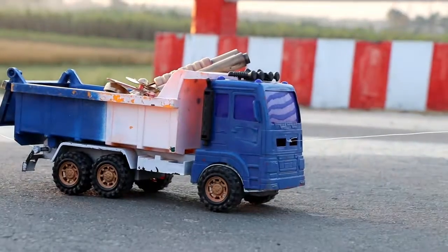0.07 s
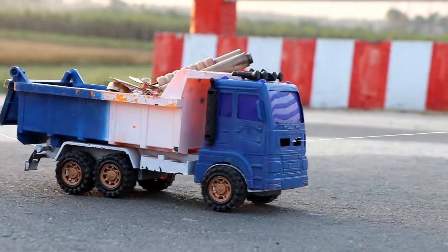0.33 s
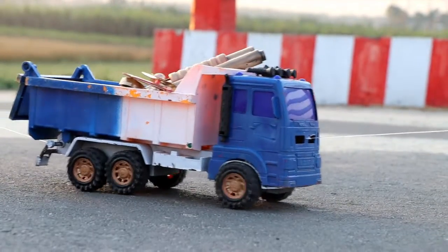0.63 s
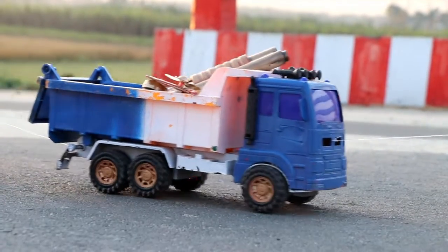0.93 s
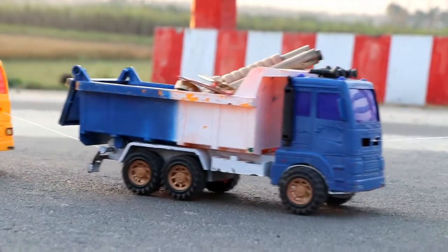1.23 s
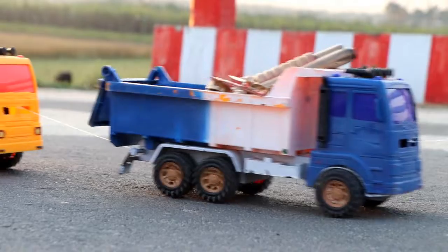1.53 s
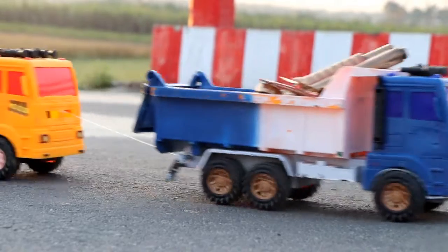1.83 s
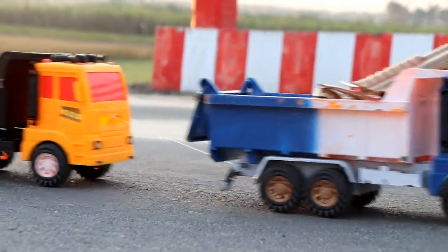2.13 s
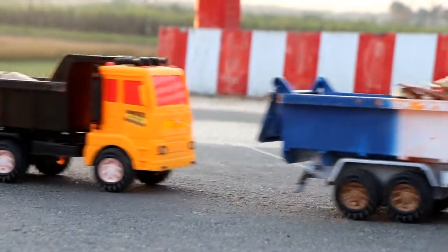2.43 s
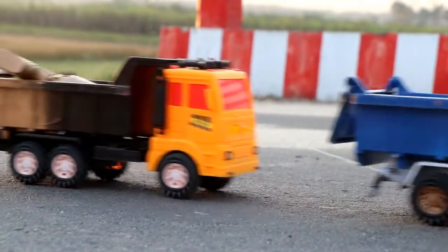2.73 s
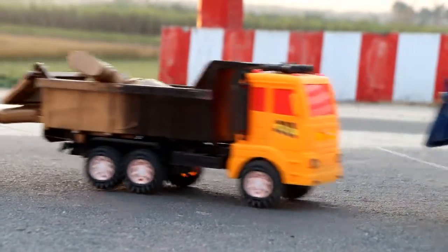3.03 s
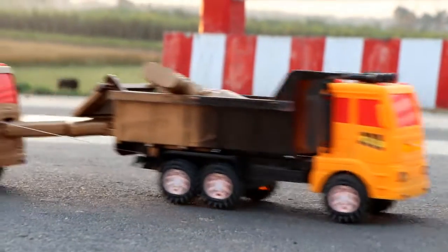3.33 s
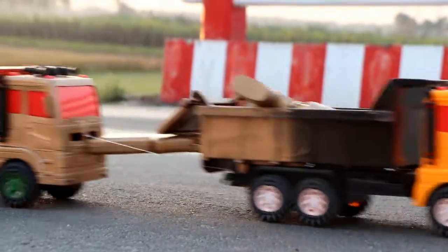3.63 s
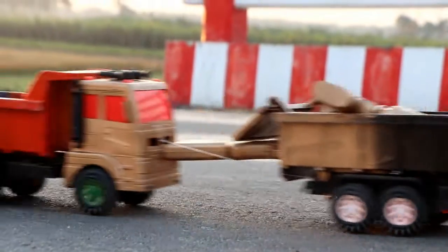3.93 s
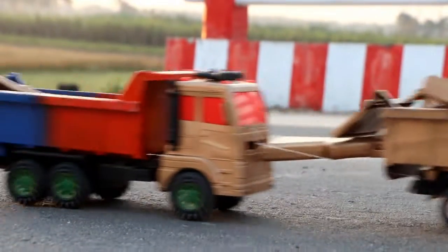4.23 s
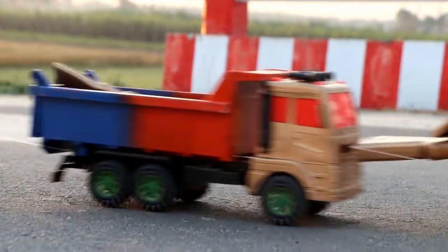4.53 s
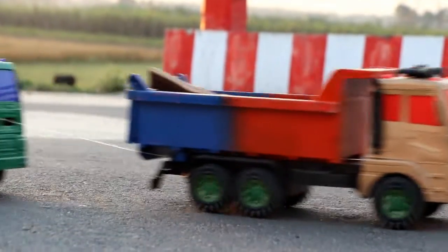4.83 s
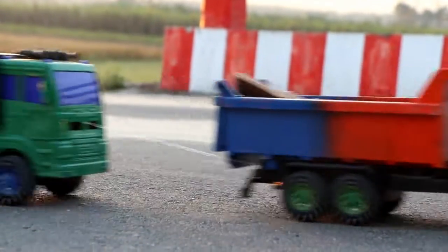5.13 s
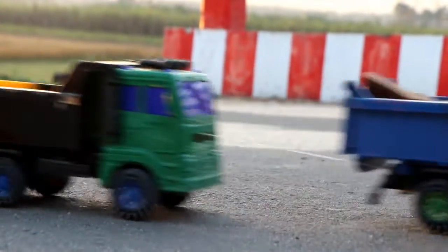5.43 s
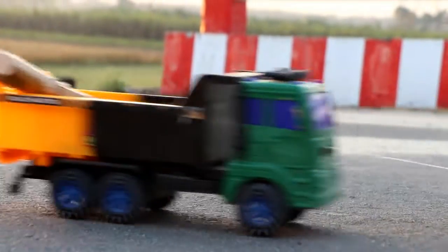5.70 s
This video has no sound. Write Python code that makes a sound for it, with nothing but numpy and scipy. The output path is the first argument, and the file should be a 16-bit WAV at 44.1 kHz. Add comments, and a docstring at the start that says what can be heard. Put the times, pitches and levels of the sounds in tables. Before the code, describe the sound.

Hollow plastic toy trucks roll close past over asphalt, rattling and knocking louder as they speed up, with grit crackling under their wheels.

```python
"""A string of hollow plastic toy trucks is pulled over asphalt, close past the listener.
First a far single-cylinder engine thuds in open country, with a brief hollow din and faint tones.
From 0.6 s the trucks crawl: dry axles chirp, wheels drop off stones and knock the plastic panels.
From about 2 s they roll faster and nearer; treads shake the shells, loose parts clatter, grit cracks.
The rear trucks take over by 3.8 s and rattle on to the end while the engine fades away."""
import sys
import numpy as np
from scipy import signal
from scipy.fft import rfft, irfft, next_fast_len
from scipy.io import wavfile
from scipy.ndimage import uniform_filter1d

SR = 44100
rng = np.random.default_rng(int(sys.argv[2]) if len(sys.argv) > 2 else 0)


def generate_wav(sig):
    """Save sig (samples, or channels by samples) to the path in sys.argv[1] as 16-bit PCM at SR."""
    pcm = np.round(np.clip(np.atleast_2d(sig).T, -1, 1) * 32767).astype(np.int16)
    wavfile.write(sys.argv[1], SR, pcm)


N = 258602
TIME = np.arange(N) / SR


def amp(db):
    """dB to gain."""
    return 10 ** (np.asarray(db) / 20)


def unit(x):
    """Scale to rms 1."""
    return x / np.sqrt(np.mean(x ** 2) + 1e-20)


def along(points, hz):
    """Interpolate (f, value) points on a log axis."""
    f, v = np.transpose(points)
    return np.interp(np.log(hz + 1), np.log(f + 1), v)


def curves(rows):
    """One per-sample curve for each column after t."""
    times, *columns = np.transpose(rows)
    return [np.interp(TIME, times, column) for column in columns]


def gate(rows, fade_samples):
    """Soft on/off from the first to the last row's t."""
    return uniform_filter1d(1. * ((TIME > rows[0][0]) & (TIME < rows[-1][0])), fade_samples)


def wobble(rate_hz):
    """Smooth random curve with knots at rate_hz."""
    knots = rng.standard_normal(int(N * rate_hz / SR) + 4)
    fine = signal.resample_poly(knots, 8, 1)
    return np.interp(TIME * rate_hz, np.linspace(0, len(knots), len(fine), endpoint=False), fine)


def filtered(x, response):
    """Apply a complex frequency response."""
    n = x.shape[-1]
    m = 2 * next_fast_len(n // 2 + 2048)
    return irfft(rfft(x, m) * response(np.fft.rfftfreq(m, 1 / SR)), m)[..., :n]


def colour(spectrum):
    """Minimum-phase response for (f, level) points."""
    def response(hz):
        cepstrum = irfft(np.log(amp(along(spectrum, hz))))
        cepstrum[1:len(cepstrum) // 2] *= 2
        cepstrum[len(cepstrum) // 2 + 1:] = 0
        return np.exp(rfft(cepstrum))
    return response


def shaped(x, spectrum):
    """Filter by a spectrum, scale to rms 1."""
    return unit(filtered(x, colour(spectrum)))


def resonance(f_hz, q):
    """Response of one ringing mode."""
    return lambda hz: 1j * hz * f_hz / (q * (f_hz ** 2 - hz ** 2) + 1j * hz * f_hz)


def shimmer(x, depth_db):
    """Small shifting spectral peaks; on a truck, different wheels and panels taking the blows."""
    bins = signal.stft(x, nperseg=1024)[2]
    field = uniform_filter1d(rng.standard_normal(bins.shape[1:]), size=4, axis=0)
    field = uniform_filter1d(field, size=7, axis=1)
    return signal.istft(bins * amp(depth_db * unit(field)), nperseg=1024)[1][:, :N]


def pan(db):
    """Stereo gains for an L-R level difference."""
    gains = amp(np.array([db, -db]).reshape(2, -1) / 2)
    return gains / np.sqrt(np.mean(gains ** 2, axis=0))


# L-R coherence: f/Hz, correlation
COHERENCE = [(100, 0.81), (300, 0.98), (700, 0.89), (1400, 0.95), (3000, 0.028), (8000, 0.046)]


def noise(size=N, lag_s=0.00012):
    """Noise at two microphone ports: alike in the bass, left delayed by lag_s."""
    m = 2 * next_fast_len(size // 2 + 1)
    hz = np.fft.rfftfreq(m, 1 / SR)
    angle = np.arccos(np.clip(along(COHERENCE, hz), -1, 1)) / 2
    mid, side = rfft(rng.standard_normal((2, m))) * np.array([np.cos(angle), np.sin(angle)])
    left = (mid + side) * np.exp(-2j * np.pi * hz * lag_s)
    return irfft(np.array([left, mid - side]))[:, :size]


def contacts(rate_hz, scatter_db, life_s):
    """Force of brief random contacts, each decaying exponentially."""
    hits = (rng.random(N) < rate_hz / SR) * amp(scatter_db * np.clip(rng.standard_normal(N), -2, 2))
    return np.sqrt(signal.lfilter([1], [1, -np.exp(-2 / (life_s * SR))], hits ** 2))


def even(force):
    """Level a force over 0.1 s, keeping its bumps."""
    return force / np.sqrt(np.abs(uniform_filter1d(force ** 2, SR // 10)) + 1e-9)


def strays(rate_hz, level_db, f_hz, scatter_db=2):
    """Poisson events on a level curve: t/s, level/dB, f/Hz."""
    draws = rng.standard_normal((100, 4))
    times = np.cumsum((draws[:, 0] ** 2 + draws[:, 1] ** 2) / 2) / rate_hz
    sizes, detunes = np.clip(draws[:, 2:], -1.5, 1.5).T
    return [(s, level_db[int(s * SR)] + scatter_db * size, f_hz * np.exp(.12 * detune))
            for s, size, detune in zip(times, sizes, detunes) if s < TIME[-1]]


# air and hiss spectra: f/Hz, level/dB
AIR_SPECTRUM = [(20, -16), (90, -6), (250, -2), (380, 5), (550, 0), (1050, -5), (1700, -2.5), (2400, -9.5),
                (3300, -8.5), (5000, -30), (15000, -58)]
HISS_SPECTRUM = [(2000, -46), (3400, 0), (5200, -1), (7000, 3), (8800, 4), (10000, -1), (12000, -5.5),
                 (15500, -15)]
# air envelope: t/s, level/dB
AIR_FADE = [(0, -55), (.2, -58), (.5, -57.5), (5.86, -69.5)]


def outdoors(hiss_db=-9.5):
    """Distant noise and a faint hiss die down together."""
    air = shaped(noise(lag_s=-0.00016), AIR_SPECTRUM)
    hiss = amp(hiss_db) * shaped(shimmer(noise(), depth_db=5.5), HISS_SPECTRUM)
    return amp(curves(AIR_FADE)[0]) * (air * pan(2.5) + hiss * pan(4.4))


# din spectrum: f/Hz, level/dB
DIN_SPECTRUM = [(400, -32), (530, 2), (650, -14), (850, -13), (1020, 4), (1220, -10), (1420, -5),
                (1580, -12), (1760, -3), (2000, -27), (4000, -60)]


def far_din(level_db=-55.5, hold_s=0.2, fade_db_per_s=70):
    """A far, hollow, unsteady din holds briefly and fades."""
    din = shaped(shimmer(noise(lag_s=-0.00014), depth_db=3.5), DIN_SPECTRUM)
    fade_db = fade_db_per_s * np.maximum(TIME - hold_s, 0)
    return amp(level_db - fade_db + 1.2 * wobble(25)) * din * pan(2.7)


# engine speed: t/s, firing rate/Hz
FIRING_RATE = [(0, 18.2), (.4, 18.8), (1.2, 19.2), (5.86, 19.2)]
# engine envelope: t/s, relative level/dB
ENGINE_LEVEL = [(0, -41.5), (.17, -40), (.23, -48), (.34, -41.5), (.45, -47), (.65, -50), (.75, -43),
                (1, -52.5), (1.5, -52.5), (3, -57.5), (5.86, -78)]
# firing spectrum: f/Hz, level/dB
THUD_SPECTRUM = [(20, -14), (40, -13), (80, -7), (120, -4.5), (160, -7), (220, -15), (400, -45),
                 (1000, -107)]


def engine(gain_db=-12, echo_s=0.0122, echo_gain=0.58, rumble_db=-7, sag_s=0.0679, sag_hz=52):
    """Each firing is a dull thud, deepest part last; distance smears some into rumble."""
    def thud(hz):
        bass_delay = np.exp(2j * np.pi * sag_s * sag_hz * (np.exp(-hz / sag_hz) - 1))
        echo = echo_gain * np.exp(-2j * np.pi * hz * echo_s)
        return colour(THUD_SPECTRUM)(hz) * bass_delay * (1 + echo)
    count = np.floor(np.cumsum(curves(FIRING_RATE)[0]) / SR + 1)
    firings = np.diff(count, prepend=0) * amp(rng.standard_normal(N))
    thuds = unit(filtered(firings, thud))
    rumble = amp(rumble_db) * shaped(noise(), THUD_SPECTRUM)
    return amp(curves(ENGINE_LEVEL)[0] + gain_db) * (thuds + rumble) * pan(0.91)


# one track per whine: t/s, f/Hz, relative level/dB
WHINE_TRACKS = [
    [(0, 8650, -68), (.4, 8650, -64), (.8, 8470, -74)],
    [(.27, 3800, -76), (.35, 3700, -68), (.55, 3500, -69), (.66, 3250, -65), (.9, 3000, -68)],
    [(.66, 2050, -67), (.75, 2170, -50), (.79, 2330, -69)],
    [(2.33, 3200, -46), (2.42, 3250, -47), (2.6, 3230, -53)],
]


def whines(relative_width=0.11):
    """Faint narrow noise flutters around a drifting pitch."""
    out = np.zeros((2, N))
    for track in WHINE_TRACKS:
        f_hz, db = curves(track)
        width_hz = relative_width * track[0][1]
        band = np.array([wobble(width_hz) + 1j * wobble(width_hz) for ear in "LR"])
        flutter = amp(2.5 * wobble(70) - 2)
        carrier = np.exp(2j * np.pi * np.cumsum(f_hz) / SR)
        out += gate(track, SR // 20) * flutter * amp(db) * np.real(band * carrier)
    return out


def glide(track, octave_db, jitter):
    """Unsteady gliding tone; its octave grows with level, reaching octave_db at -43 dB."""
    f_hz, db = curves(track)
    phase = 2 * np.pi * np.cumsum(f_hz * (1 + jitter * wobble(370))) / SR
    tone = np.sin(phase) + amp(octave_db + db + 43) * np.sin(2 * phase)
    return gate(track, SR // 100) * amp(db + 3.8 * wobble(90)) * tone


# one track per tone: t/s, f/Hz, level/dB
TONE_TRACKS = [
    [(0, 416, -56), (.05, 444, -51), (.1, 406, -63)],
    [(.12, 410, -61), (.16, 385, -47), (.23, 352, -58)],
    [(.28, 890, -73), (.35, 910, -56), (.39, 920, -68)],
]


def low_tones():
    """Faint, nearly pure gliding tones."""
    return sum(glide(track, octave_db=-22, jitter=0.011) for track in TONE_TRACKS)


# one track per chirp: t/s, f/Hz, level/dB
CHIRP_TRACKS = [
    [(.65, 1200, -66), (.70, 1260, -55), (.75, 1280, -70), (.78, 1400, -55), (.83, 1500, -62),
     (.89, 1440, -62)],
    [(1.83, 1650, -45.5), (1.87, 1570, -48), (1.95, 1450, -44)],
    [(1.95, 1616, -48), (1.99, 1570, -44), (2.07, 1430, -45)],
]


def axle_chirps():
    """Dry axles chirp in short, rough glides."""
    return sum(glide(track, octave_db=-2.5, jitter=0.0314) for track in CHIRP_TRACKS)


def lifts(patches, edge_s=0.0043):
    """Boost in dB that ramps up, holds and falls as a wheel crosses each patch."""
    return sum(db * np.clip(np.minimum(TIME - s, s + length_s - TIME) / edge_s + .5, 0, 1)
               for s, length_s, db in patches)


PASS_DB = -31  # rolling level at the close pass
# trucks speeding up and nearing: t/s, level/dB
ROLLING_LEVEL = [(0, -57.5), (.58, -73), (.7, -63), (.9, -53), (1.1, -46.5), (1.42, -46), (1.59, -42),
                 (1.7, -41.5), (2.1, -40), (2.18, -43), (2.3, -37.5), (2.6, -36), (2.75, -31.5),
                 (3.58, -33), (4.2, -30.5), (4.45, -32), (5.3, -30), (5.86, -30)]
# rough asphalt: t/s, length/s, boost/dB
ROUGH_ROAD = [(.66, 0.1, 8), (.935, 0.038, 3.5), (1.49, 0.021, 4.5), (1.618, 0.11, 4.5),
              (2.225, 0.034, 3.5), (2.358, 0.037, 3), (2.46, 0.03, 3.5), (3.07, 0.049, 2.5),
              (3.36, 0.185, 1.1), (3.7, 0.09, 2.3), (4.73, 0.045, 3.5), (5.62, 0.16, 1)]


def shake_db():
    """Shaking re the close pass, from speed, nearness and rough road."""
    return curves(ROLLING_LEVEL)[0] + lifts(ROUGH_ROAD) - PASS_DB


# loose grit: t/s, length/s, boost/dB
LOOSE_GRIT = [(.68, 0.15, 23.5), (.93, .12, 14.5), (1.61, 0.17, 2), (2.55, 0.46, 1.5), (4.03, 0.26, 2),
              (5.24, 0.43, 2.5)]


def grit_db():
    """Grit level rises with shaking and where tyres scrape through loose grains."""
    return -46 + 1.82 * shake_db() + lifts(LOOSE_GRIT)


# position of the gritty wheels: t/s, L-R/dB
WHEEL_PAN = [(1, -1), (1.7, -5), (3.3, -7), (4, -4.5), (5.86, -5)]


def wheel_pan_db():
    """L-R difference along the wheels' path."""
    return curves(WHEEL_PAN)[0]


# fine sand: t/s, length/s, level/dB
SAND_PATCHES = [(2.68, .42, -48)]
# sand spectrum: f/Hz, level/dB
SAND_SPECTRUM = [(4000, -45), (6500, -26), (8300, 6), (9300, 3), (10500, -24), (15500, -35)]


def sand():
    """A wheel ploughs through fine sand: a grainy swell in one high band."""
    grains = even(contacts(350, scatter_db=4, life_s=.0015) + .35)
    swish = shaped(grains * noise(), SAND_SPECTRUM)
    swell = sum(amp(db) * np.sin(np.pi * np.clip((TIME - s) / length_s, 0, 1))
                for s, length_s, db in SAND_PATCHES)
    return swell * swish * pan(wheel_pan_db())


# grit spectrum: f/Hz, level/dB
GRIT_SPECTRUM = [(2500, -42), (4000, -20), (4950, -8), (5500, 0.5), (6800, 1), (8200, -1), (9800, -10.5),
                 (11000, -10), (12500, -10.5), (15500, -12.5)]
# tread block modes: f/Hz
TREAD_HZ = [6540, 7460, 8000, 9600]


def grit(crush, crackle_db=-4.5):
    """Wheels crush grit; fine grains burst and ring the tread blocks."""
    crunch = shaped(shimmer(crush * noise(), depth_db=4), GRIT_SPECTRUM)
    crackle = 0
    for f_hz in TREAD_HZ:
        bursts = contacts(70, scatter_db=-1, life_s=0.0005) * noise()
        block = resonance(f_hz, q=7)
        crackle += unit(filtered(bursts, lambda hz: colour(GRIT_SPECTRUM)(hz) * block(hz)))
    return amp(grit_db()) * (crunch + amp(crackle_db) * unit(crackle)) * pan(wheel_pan_db())


# large grains: t/s, relative level/dB, f/Hz, L-R/dB
GRAIN_CRACKS = [(2.082, -32, 9900, 6), (2.577, -36, 7550, -10), (2.6215, -32, 8000, -14),
                (2.635, -28.5, 7300, -10), (2.705, -32, 7900, -19), (2.7896, -33, 6310, -7),
                (2.816, -35, 6280, -8), (2.894, -27, 8450, -7), (3.1166, -18.5, 7060, -10.5),
                (3.233, -27.5, 7600, -18), (3.3735, -29.5, 7300, -3), (3.3978, -31.5, 7060, -9),
                (3.482, -22.5, 7550, -16), (3.5198, -22, 6100, -11), (4.533, -21, 6300, -3),
                (4.849, -29, 7400, 6), (5.177, -28, 6600, -8), (5.4696, -26, 6560, -2),
                (5.681, -29, 5560, -6), (5.734, -27.5, 5700, -4), (5.7675, -24, 6750, -2)]


def cracks(gain_db=4, rim_db=-4, life_s=0.00083, splinters=0.16):
    """Grains snap: a sharp click, a spray of splinters, a brief ring of the wheel rim."""
    out, t = np.zeros((2, N + SR)), np.arange(SR // 20) / SR
    side_db = wheel_pan_db()
    small_grains = [(s, db, f_hz, side_db[int(s * SR)])
                    for s, db, f_hz in strays(rate_hz=3.2, level_db=grit_db() + 3.5, f_hz=7200)]
    envelope = (np.exp(-t / life_s) + splinters * np.exp(-t / .004)) * (1 - np.exp(-t / .0006)) ** 2
    for s, db, f_hz, pan_db in GRAIN_CRACKS + small_grains:
        snap = noise(len(t)) * envelope
        body_db = 16 + .8 * (db + 21)  # larger grain, more body
        spectrum = [(500, -28.5), (2200, body_db), (4800, 0.5), (7000, 5), (12000, 0.5), (16000, -3.5)]
        rim = amp(rim_db) * unit(filtered(snap, resonance(f_hz, q=17)))
        crack = (shaped(snap, spectrum) + rim) * pan(pan_db)
        out[:, round(s * SR):][:, :len(t)] += amp(db + gain_db) * crack / np.abs(crack.mean(0)).max()
    return out[:, :N]


# small part impacts: t/s, level/dB, f/Hz
PART_CLACKS = [(0.957, -40, 3000), (1.007, -40, 3070), (1.04, -46, 3540), (1.112, -40, 3080),
               (1.1263, -29.5, 3170), (1.231, -40, 3300), (1.368, -40, 3080), (1.411, -32.5, 1460),
               (1.502, -33, 3270), (1.632, -30.5, 3200), (1.7005, -26, 1900), (1.709, -32, 3330),
               (2.013, -37, 3180), (3.4814, -22.5, 3200), (3.5192, -28, 2800)]


def clacks(life_s=0.0045):
    """Small hard parts strike each other with a short, narrow ring."""
    out, t = np.zeros((2, N + SR)), np.arange(SR // 20) / SR
    for s, db, f_hz in PART_CLACKS:
        mode = resonance(f_hz, q=4.7)
        ring = filtered(noise(len(t)) * np.exp(-t / life_s), lambda hz: mode(hz) ** 2)
        out[:, round(s * SR):][:, :len(t)] += amp(db) * ring / np.abs(ring).max()
    return out[:, :N]


# tray spectrum: f/Hz, level/dB
TRAY_SPECTRUM = [(100, -50), (180, -13), (250, -25), (330, 1), (410, 3.5), (520, 2), (650, 4.5),
                 (1000, -74)]


def trays(bumps):
    """Bumps drum on the trucks' trays in the low mids."""
    drumming = shaped(shimmer(bumps * noise(), depth_db=2.5), TRAY_SPECTRUM)
    return amp(-38.5 + 1.53 * shake_db()) * drumming


TO_SECOND_TRUCK_S, TO_REAR_TRUCKS_S = (1.7, 3.0), (3.0, 3.8)


def handover(leading, following, span_s):
    """Crossfade from one truck to those behind it."""
    share = np.interp(TIME, span_s, [0, 1])
    return unit((1 - share) * unit(leading) + share * unit(following))


# loose part spectra of the lead, second and rear trucks: f/Hz, level/dB
LEAD_PARTS = [(600, -42), (980, -6.5), (1200, 1.5), (1450, -5), (1700, -6.5), (1950, -1.5), (2300, -2.5),
              (2650, -18.5), (3150, -7.5), (4000, -19), (5000, -30), (9000, -70)]
SECOND_PARTS = [(600, -36), (980, -5), (1250, 1.5), (1550, -2.5), (1800, -1.5), (2050, -4), (2650, -12.5),
                (3200, -9), (4100, -18.5), (5000, -25), (9000, -61)]
REAR_PARTS = [(600, -40.5), (950, -2), (1200, 1.5), (1600, -2), (2200, -6), (2650, -11.5), (3100, -9.5),
              (4100, -15.5), (5000, -29), (9000, -59)]


def clatter(rattle):
    """Loose parts rattle, each truck in its own bands."""
    blows = shimmer(rattle * noise(), depth_db=2)
    followers = handover(shaped(blows, SECOND_PARTS), shaped(blows, REAR_PARTS), TO_REAR_TRUCKS_S)
    parts = handover(shaped(blows, LEAD_PARTS), followers, TO_SECOND_TRUCK_S)
    return amp(-30.5 + 1.44 * shake_db()) * parts * pan(-1.4)


def shell_ring(blows, modes):
    """A hollow body's ring, rms 1; alternating mode signs steepen its skirts."""
    def response(hz):
        return sum((-1) ** k * amp(db) * resonance(f_hz, q=f_hz / width_hz)(hz)
                   for k, (f_hz, width_hz, db) in enumerate(modes))
    return unit(filtered(blows, response))


# shell modes of the two front trucks and the rear ones: f/Hz, width/Hz, level/dB
FRONT_MODES = [(656, 104, -1.5), (808, 131, -1)]
REAR_MODES = [(677, 158, -1), (878, 120, -0.5)]


def shells(bumps):
    """Bumps ring the hollow plastic shells."""
    blows = shimmer(bumps * noise(), depth_db=1.5)
    ring = handover(shell_ring(blows, FRONT_MODES), shell_ring(blows, REAR_MODES), TO_REAR_TRUCKS_S)
    return amp(PASS_DB + shake_db()) * ring * pan(-3.5)


def rolling():
    """Treads bump over stones, driving shells, trays, loose parts and grit."""
    bump_rate_hz = np.interp(TIME, [.6, 1.6, 3], [240, 320, 500])  # more wheels, rolling faster
    steady_force = np.interp(TIME, [.5, .9, 2.2, 3], [1, .8, .7, .92])
    rocking = amp(0.75 * wobble(45) + 0.14 * wobble(11))
    bumps = even(rocking * (contacts(bump_rate_hz, scatter_db=2.3, life_s=.0014) + steady_force))
    rattle = even(bumps * (contacts(800, scatter_db=2.7, life_s=.0008) + 1.7))
    crush = even(rocking * (contacts(400, scatter_db=3.5, life_s=.014) + 1.3) + 0.23 * bumps)
    return shells(bumps) + trays(bumps) + clatter(rattle) + grit(crush)


# chassis drops: t/s, relative level/dB, panel f/Hz, relative clatter/dB
CHASSIS_DROPS = [(0.656, -39.5, 750, 1), (0.724, -36, 674, -1), (0.821, -32.5, 878, -7.5),
                 (0.913, -37.5, 775, -5), (0.937, -36, 760, 3), (1.007, -37, 670, -3),
                 (1.147, -30.5, 690, -21), (1.368, -39, 740, 2), (1.509, -27.5, 775, -4),
                 (1.613, -29.5, 750, -2), (1.629, -26, 805, -7), (1.652, -27, 740, 0),
                 (1.743, -24.5, 726, 6), (1.757, -27, 762, -3), (1.861, -28.5, 730, -3),
                 (1.888, -24.5, 800, 3), (1.9415, -25.5, 1320, 4), (2.014, -24, 1190, 6),
                 (2.096, -25.5, 934, 4), (2.131, -24.5, 740, -9), (2.357, -21, 646, 10),
                 (2.375, -28, 880, 3), (2.430, -20, 616, 1), (2.465, -18, 710, -3), (2.491, -28, 816, 7),
                 (2.5415, -20.5, 680, -25), (2.755, -19, 776, 4), (2.882, -20.5, 680, 11),
                 (2.957, -21, 670, -10), (3.064, -19.5, 710, -4), (3.083, -17.5, 646, -15),
                 (3.337, -18.5, 656, 10), (3.411, -19, 870, -5), (3.608, -14.5, 760, -2),
                 (3.731, -16.5, 880, -5), (3.763, -17, 890, -2), (3.89, -20.5, 740, -17),
                 (4.173, -19, 755, -12), (4.245, -22, 620, -5), (4.316, -10, 1195, -0.5),
                 (4.329, -16, 850, -6), (4.362, -18, 900, 6), (4.403, -24, 750, -18),
                 (4.650, -16.5, 838, 4.5), (4.754, -17, 610, -1), (4.82, -17, 805, 2),
                 (4.983, -15, 1100, 6), (5.05, -19, 914, -2), (5.583, -17.5, 864, -1), (5.732, -16, 740, 7)]


def knocks(gain_db=-1, life_s=0.0013, chatter=0.33, shell_db=-3, parts_db=-1):
    """A chassis drops off a stone and rings one panel; shell and loose parts chatter to rest."""
    out, t = np.zeros((2, N + SR)), np.arange(SR // 10) / SR
    jolts = strays(rate_hz=0.84, level_db=PASS_DB + shake_db() - 12, f_hz=830)
    light_drops = [(s, db, f_hz, -4) for s, db, f_hz in jolts]
    for s, db, f_hz, clatter_db in CHASSIS_DROPS + light_drops:
        port_phase = rng.normal(0, .6, (2, 1))
        drop_s = np.interp(s, [.8, 2.2], [0.0031, 0.00085])  # crawl to full speed
        rise = 1 - np.exp(-t / drop_s)
        envelope = rise * t * np.exp(-t / (.0016 + drop_s / 3))
        panel = unit(envelope * np.sin(2 * np.pi * f_hz * t + port_phase))
        blow = noise(len(t)) * (np.exp(-t / life_s) + chatter * np.exp(-t / .02)) * rise
        parts = amp(clatter_db + parts_db) * shaped(blow, REAR_PARTS)
        knock = panel + amp(shell_db) * shell_ring(blow, REAR_MODES) + parts
        out[:, round(s * SR):][:, :len(t)] += amp(db + gain_db) * knock / np.abs(knock.mean(0)).max()
    return out[:, :N] * pan(-0.97)


def scene():
    """Trucks in front of the far engine and quiet outdoor air."""
    tones = axle_chirps() + low_tones()
    trucks = rolling() + knocks() + clacks() + cracks() + sand()
    background = whines() + engine() + far_din() + outdoors()
    return background + tones + trucks


def record(dry, top_hz=15950):
    """Two microphone ports colour the treble differently; nothing passes above top_hz."""
    balance = [(1200, 0.9), (2400, -4.5), (3500, 0.5), (8000, 0.0), (13000, -9.0)]  # f/Hz, L-R/dB
    return filtered(dry, lambda hz: pan(along(balance, hz)) * (hz < top_hz))


dry = scene()
out = record(dry)
generate_wav(out)
```